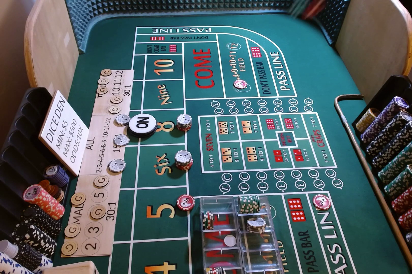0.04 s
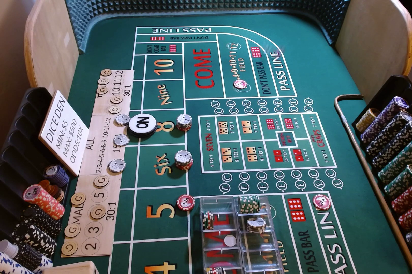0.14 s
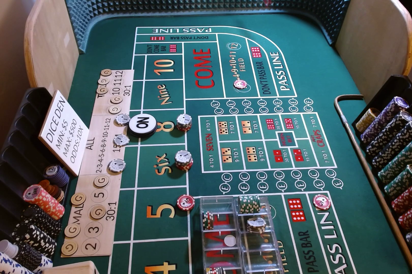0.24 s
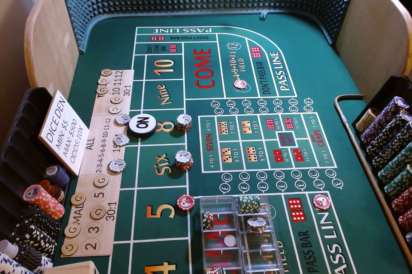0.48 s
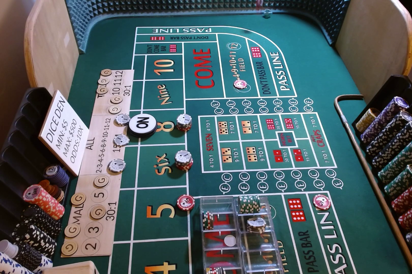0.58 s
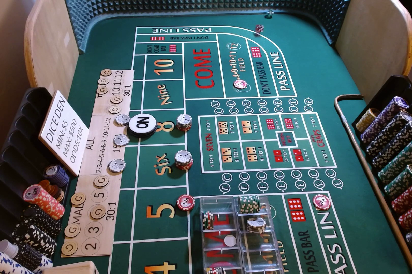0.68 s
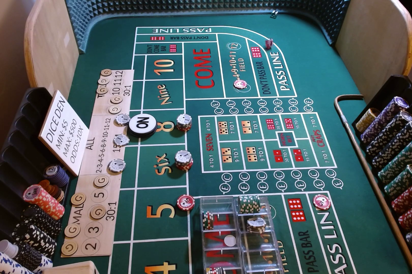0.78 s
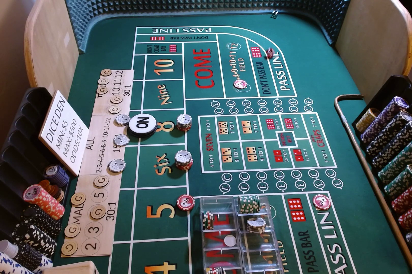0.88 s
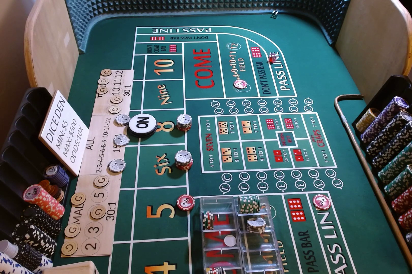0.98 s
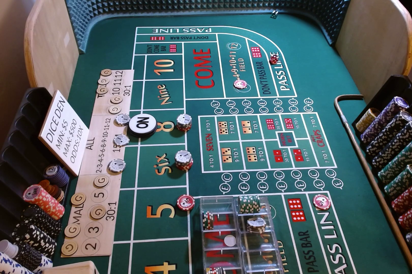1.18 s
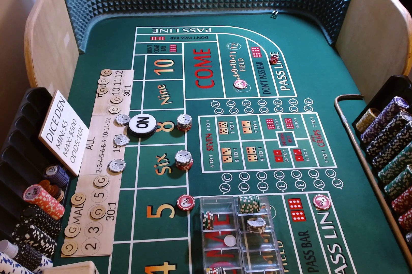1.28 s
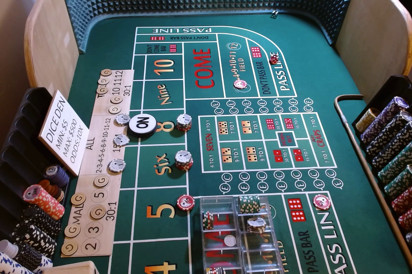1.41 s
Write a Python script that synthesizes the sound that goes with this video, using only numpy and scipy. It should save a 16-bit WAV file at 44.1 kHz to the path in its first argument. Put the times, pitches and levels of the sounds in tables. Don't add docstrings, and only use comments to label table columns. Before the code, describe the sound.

Dice thrown on a felt-covered table in a quiet room. After faint air hush and a wavering low hum, a very loud, hard double crack on hollow wood comes at 0.21 s, almost one hit. Soft thuds skip from 0.33 to 0.4, a clearer tap at 0.51, a woody knock at 0.69, then light bounces at 0.81 and 0.9 fade by 1.07. Bright early echoes, short tail, mono.

```python
import sys
import numpy as np
from scipy import signal
from scipy.fft import rfft, irfft
from scipy.io import wavfile
from scipy.ndimage import uniform_filter1d

SR = 44100
rng = np.random.default_rng(int(sys.argv[2]) if len(sys.argv) > 2 else 0)


def unload_wav(signal):
    wavfile.write(
        sys.argv[1],
        SR,
        np.round(np.clip(np.atleast_2d(signal).T, -1, 1) * 32767).astype(np.int16),
    )


def voltage_ratio(decibels):
    exponent = np.asarray(decibels, float) / 20
    return 10 ** exponent


N = 63945
TRAVEL_MS = 1.5

# (frequency [Hz], level [dB])
WOOD_TICK = [(3000, -31.5), (4600, -2), (5600, 1.5), (7500, -6), (10000, -14.5), (13500, -17),
             (16000, -21.5)]


def dice():
    contact_sound = rail_cracks() + wall_crack() + felt_thuds()
    low_cut = signal.butter(3, 75, "high", fs=SR, output="sos")
    return signal.sosfilt(low_cut, contact_sound)


def rail_cracks():
    # (time [s], knock level [dB], crack level [dB], edge tick level [dB], contact time [ms])
    rail_hits = [
        (.2113, -21, -6, -36, 0.402),
        (.2139, -17, -10, -42, .4),
    ]
    # (frequency [Hz], level [dB], time to fall 60 dB [s])
    rail_box = [(65, -19.5, .15), (133.2, -10.5, 0.15), (148.15, -4.5, 0.061), (226.2, -9, 0.15),
                (407, -10, .03), (557, 0, .045), (573.8, -2, .04), (695, -6, .035), (746, -5.5, .035)]
    # (frequency [Hz], level [dB], time to fall 60 dB [s])
    rail_face = [(1372, -6.5, 0.018), (1667, -6, 0.018), (2077, 5.5, 0.006), (2408, -4, 0.012),
                 (2908, -4, 0.013), (3290, -3.5, 0.011), (3745, 0, 0.0039), (4130, -2.5, 0.0043),
                 (4700, -8.5, .004)]
    return contacts(rail_hits, rail_box, rail_face, WOOD_TICK, room_db=4.0)


def wall_crack():
    # (time [s], knock level [dB], crack level [dB], edge tick level [dB], contact time [ms])
    wall_hits = [
        (.6862, -23.5, -18.5, -46.5, 0.73),
    ]
    # (frequency [Hz], level [dB], time to fall 60 dB [s])
    wall_panel = [(145, -19, .1), (169, -7, .08), (230, -1.5, 0.048), (560, -2, 0.034), (614, 10, 0.024),
                  (758, 1, 0.018), (770, -4, 0.051)]
    # (frequency [Hz], level [dB], time to fall 60 dB [s])
    wall_face = [(1307, -6, 0.011), (1480, -17.5, 0.011), (1830, -6, 0.02), (2050, -2.5, 0.019),
                 (2626, 3, 0.011), (3456, -4.5, 0.0069), (3900, -13, 0.0077), (4700, -22, .005)]
    return contacts(wall_hits, wall_panel, wall_face, WOOD_TICK, room_db=1.5)


def felt_thuds():
    # (time [s], thud level [dB], snap level [dB], edge tick level [dB],
    # contact time [ms])
    felt_hits = [(.333, -28, -40, -85, 0.65), (.345, -44, -69, -85, 0.68), (.355, -59, -48.5, -90, 0.5),
                 (.378, -35.5, -51, -91, 1.3), (.399, -42.5, -48, -87, 1.75),
                 (.5112, -30.5, -30.5, -52, 0.88), (.548, -62, -57, -95, 1.49),
                 (.592, -40.5, -79, -102, 2.7), (.632, -59.5, -72, -99, 0.43),
                 (.812, -39, -51.5, -100, 1.71), (.838, -54, -68, -97, 0.41), (.862, -76, -63, -96, 1),
                 (.898, -36.5, -40.5, -62, 1.04), (.929, -58, -60, -96, 2.25), (.975, -56.5, -76, -75, 1.6),
                 (1.025, -51, -61, -108, 3.45), (1.068, -79, -70, -104.5, 1.9),
                 (.3648, -52, -58, -60, 1.2),
    ]
    # (frequency [Hz], level [dB], time to fall 60 dB [s])
    table_top = [(118, -15.5, 0.23), (153, -12.5, 0.13), (240.7, 2, 0.07), (301, -1.5, 0.11),
                 (366.3, 0, 0.096), (530, -8, 0.031), (634, 1.5, 0.03), (768, -5.5, 0.027)]
    # (frequency [Hz], level [dB], time to fall 60 dB [s])
    board_snap = [(833, 2, 0.0068), (1155, -2.5, 0.0086), (1510, -8.5, 0.0064), (1574, -6, 0.0086),
                  (2020, -8, 0.01), (2450, -10, 0.0072), (3064, -0.5, 0.0025), (4200, -5.5, 0.0031)]
    # (frequency [Hz], level [dB])
    felt_tick = [(2500, -10.5), (4200, -2), (5600, -2), (7300, -9), (9000, -20.5), (13000, -29),
                 (16000, -49)]
    return contacts(felt_hits, table_top, board_snap, felt_tick, room_db=2.5)


def contacts(hits, low_modes, high_modes, tick_colour, room_db):
    body_wet_db = -4.0
    tick_wet_db = 10.0
    out = np.zeros(N)
    spots = np.clip(rng.standard_normal((len(hits), 2, 24)), -2, 2)
    for (s, low_db, high_db, tick_db, contact_ms), spot in zip(hits, spots):
        contact_part = np.arange(200) / (SR * contact_ms / 1000)
        push = np.sin(np.pi * np.minimum(contact_part, 1)) ** 2
        body = voltage_ratio(low_db) * ring(low_modes, spot[0], push)
        face = voltage_ratio(high_db) * ring(high_modes, spot[1], np.ones(1))
        tick = voltage_ratio(tick_db) * click(tick_colour)
        add(out, s, echoes(body + face, column=1))
        add(out, s + TRAVEL_MS / 2000, echoes(tick, column=2))
        into_room = voltage_ratio(body_wet_db) * body + face + voltage_ratio(tick_wet_db) * tick
        add(out, s, voltage_ratio(room_db) * signal.fftconvolve(into_room, tail()))
    return out


def ring(modes, spot, push):
    spot_db, spot_pitch, build_ms = 2.0, 0.025, 0.92
    t = np.arange(8000)[:, None] / SR
    hz, db, t60 = np.transpose(modes)
    hz = hz * (1 + spot_pitch * spot[-len(hz):])
    lag = 2 * TRAVEL_MS * np.sqrt(hz / 1000)
    strength = voltage_ratio(db + spot_db * spot[:len(hz)] - 60 * t / t60)
    tones = strength * np.sin(2 * np.pi * (hz * t - lag))
    build_up = 1 - np.exp(-t[:, 0] * 1000 / build_ms)
    out = np.convolve(tones.sum(axis=1) * build_up, push)[:len(t)]
    return out / abs(out).max()


def click(spectrum):
    hz = abs(np.fft.fftfreq(8192, 1 / SR))
    log_gain = np.log(voltage_ratio(read(spectrum, hz)))
    phase = -signal.hilbert(log_gain).imag
    out = np.fft.ifft(np.exp(log_gain + 1j * phase)).real[:8000]
    return out / abs(out).max()


def echoes(x, column):
    # (delay [ms], level for body and face [dB], level for edge tick [dB])
    reflections = [(6.8, -3, 9), (11.7, -7, 3), (15.5, -9, -3), (23.5, -5, -1)]
    out = np.copy(x)
    for k, row in enumerate(reflections):
        add(out, row[0] / 1000, (-1) ** k * voltage_ratio(row[column]) * x)
    return out


def tail():
    # (frequency [Hz], time to fall 60 dB [s])
    room_decay = [(100, 0.48), (300, 0.27), (700, 0.2), (1500, 0.3), (3000, 0.24), (6000, 0.22),
                  (10000, 0.18), (15000, 0.067)]
    # (frequency [Hz], level [dB])
    room_colour = [(100, -7), (300, -1), (700, 5), (2000, -5), (5000, -0.5), (12000, -1.5)]
    late_db, late_stretch = -32.5, 3.5
    start_s, rise_s = 0.001, 0.0087
    size = SR * 3 // 4
    taps = np.zeros(size)
    slots = np.arange(0, size - 16, 16)
    places = slots + rng.integers(0, 16, len(slots))
    taps[places] = rng.choice([-1., 1.], len(slots))
    hz, t, z = signal.stft(taps, SR, nperseg=512)
    fall_db = -60 * t / read(room_decay, hz)[:, None]
    fall = voltage_ratio(fall_db) + voltage_ratio(late_db + fall_db / late_stretch)
    colour = voltage_ratio(read(room_colour, hz)[:, None])
    out = signal.istft(z * colour * fall, SR, nperseg=512)[1][:size]
    rise = np.clip((np.arange(size) / SR - start_s) / rise_s, 0, 1)
    out = unring(out) * rise
    return out / np.linalg.norm(out)


def unring(x):
    peak_cap = 1.15
    z = rfft(x, 2 * len(x))
    narrow, wide = (np.sqrt(abs(uniform_filter1d(abs(z) ** 2, size=k)) + 1e-20) for k in (30, 400))
    return irfft(z * np.minimum(1, peak_cap * wide / narrow))[:len(x)]


def hum():
    # (time [s], frequency [Hz], level [dB])
    motor_tone = [(0, 119, -70), (0.101, 118, -57.5), (.19, 118, -73.5), (0.452, 118, -57), (.65, 118, -60),
                  (.85, 118.4, -60), (1.02, 116, -56.5), (1.08, 115.8, -68), (1.201, 121.7, -70.5),
                  (1.261, 118, -60), (1.38, 117.3, -61), (1.45, 117, -78.5)]
    fuzz_hz, fuzz = 10, 0.1
    t = np.arange(N) / SR
    s, hz, db = np.transpose(motor_tone)
    r = np.exp(-np.pi * fuzz_hz / SR)
    noises = rng.standard_normal((2, N))
    a, b = (evened(signal.lfilter([1], [1, -2 * r, r * r], v)) for v in noises)
    turn = np.exp(2j * np.pi * np.cumsum(np.interp(t, s, hz)) / SR)
    tone = (turn * (1 + fuzz * (a + 1j * b))).real
    return voltage_ratio(np.interp(t, s, db)) * np.sqrt(2) * tone


def hush():
    # (frequency [Hz], level [dB per Hz])
    air_noise = [(25, -85.5), (90, -83.5), (200, -96.5), (600, -91.5), (950, -104), (2600, -114),
                 (4200, -128), (15000, -137)]
    patchy_db = 0.7
    frames, hz = N // 512 + 5, np.fft.rfftfreq(2048, 1 / SR)
    a, b, patches = rng.standard_normal((frames, 1025, 3)).T
    patches = uniform_filter1d(patches, size=12, axis=0)
    patches = evened(uniform_filter1d(patches, size=8, axis=1))
    z = (a + 1j * b) * voltage_ratio(read(air_noise, hz)[:, None] + patchy_db * patches)
    return 5.92 * signal.istft(z, nperseg=2048, noverlap=1536)[1][:N]


def evened(x):
    return x / np.sqrt(np.mean(x ** 2) + 1e-20)


def read(points, hz):
    f, value = np.transpose(points)
    return np.interp(np.log(hz + 1), np.log(f + 1), value)


def add(mix, s, sound):
    part = mix[round(s * SR):][:len(sound)]
    part += sound[:len(part)]


def scene():
    return (dice() + hum() + hush())[None]


def roll_off(x):
    return signal.sosfilt(signal.butter(12, 15740, fs=SR, output="sos"), x)


def record(dry):
    return roll_off(dry)


dry = scene()
out = record(dry)
unload_wav(out)
```